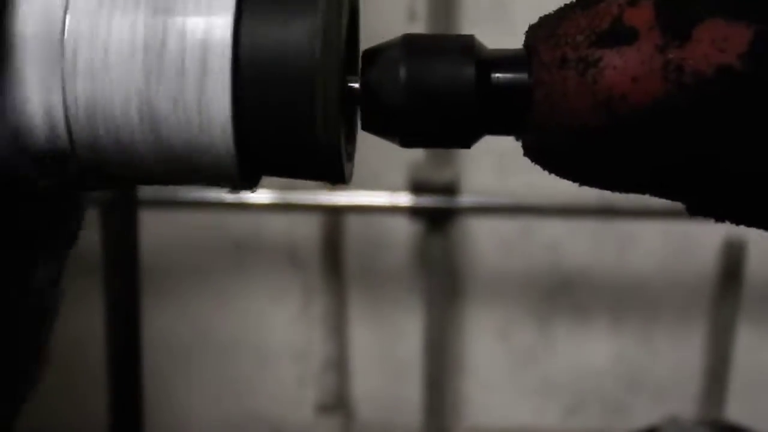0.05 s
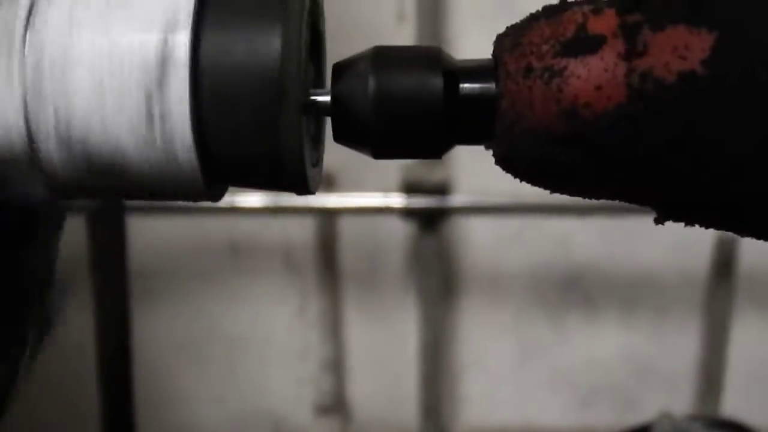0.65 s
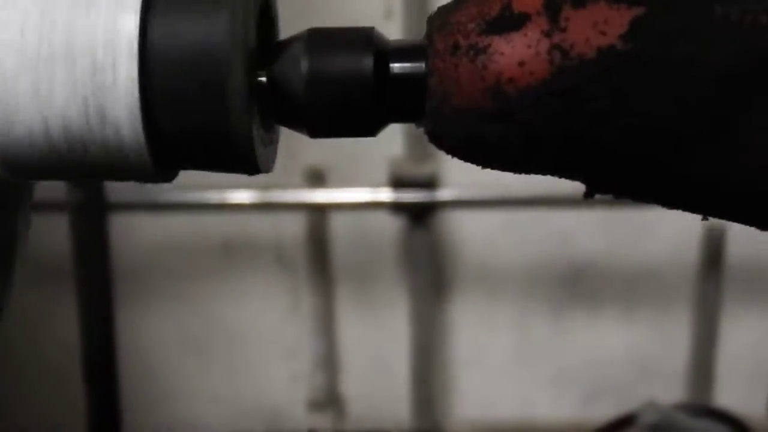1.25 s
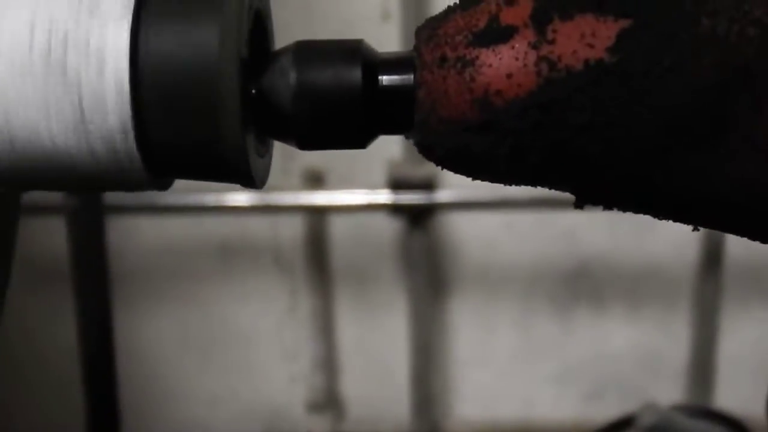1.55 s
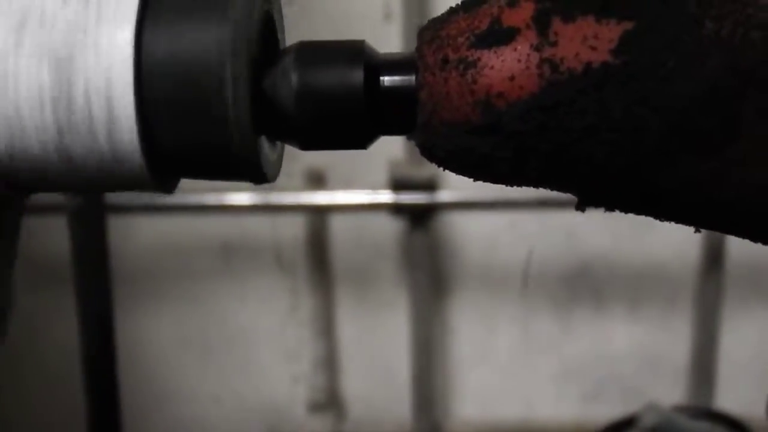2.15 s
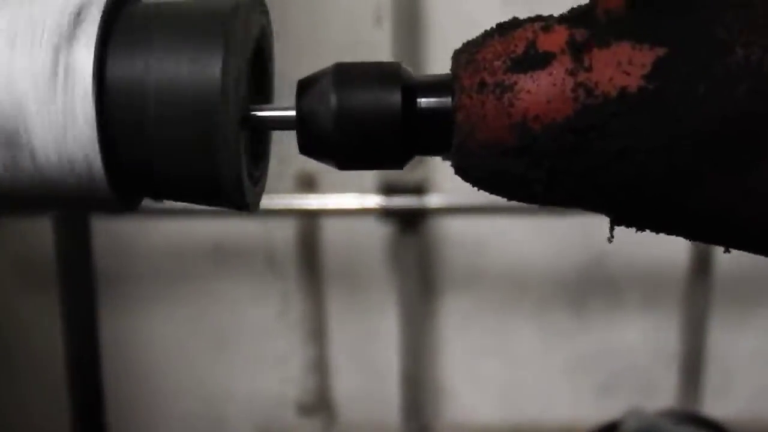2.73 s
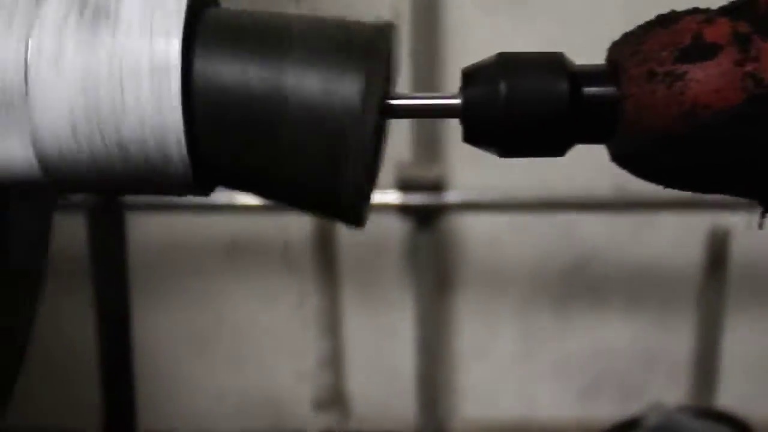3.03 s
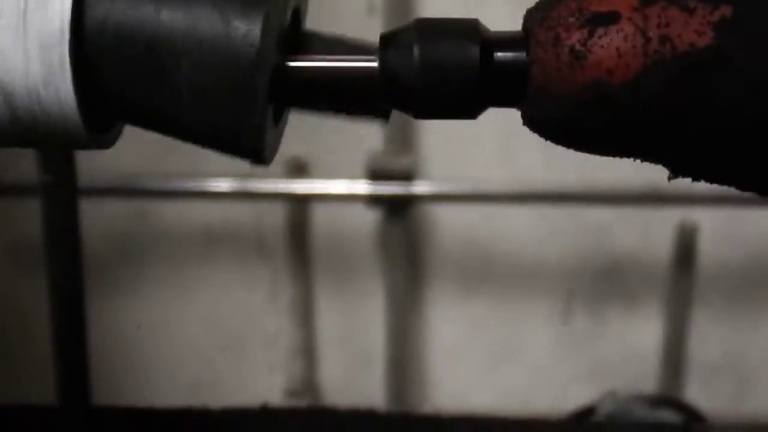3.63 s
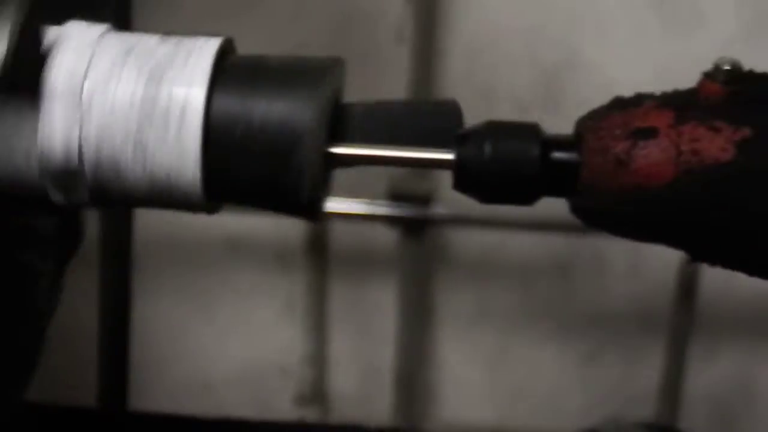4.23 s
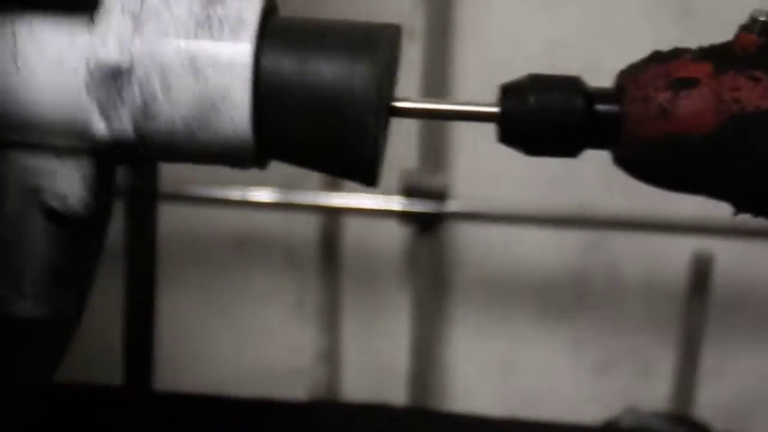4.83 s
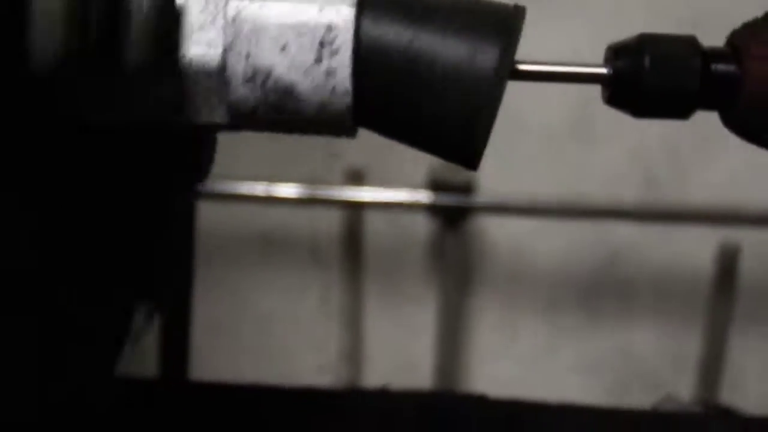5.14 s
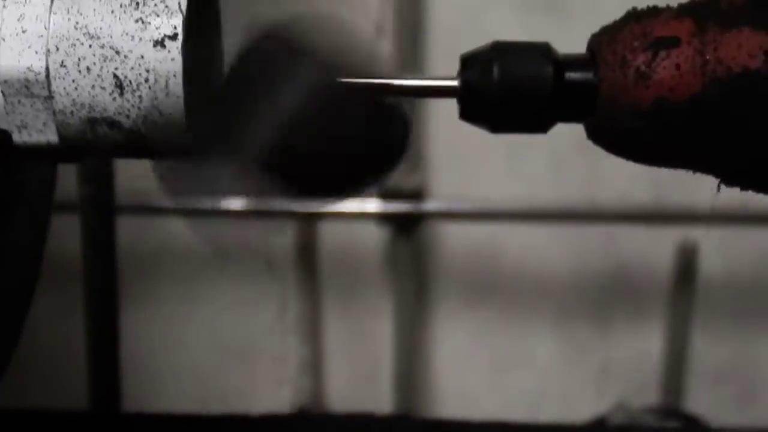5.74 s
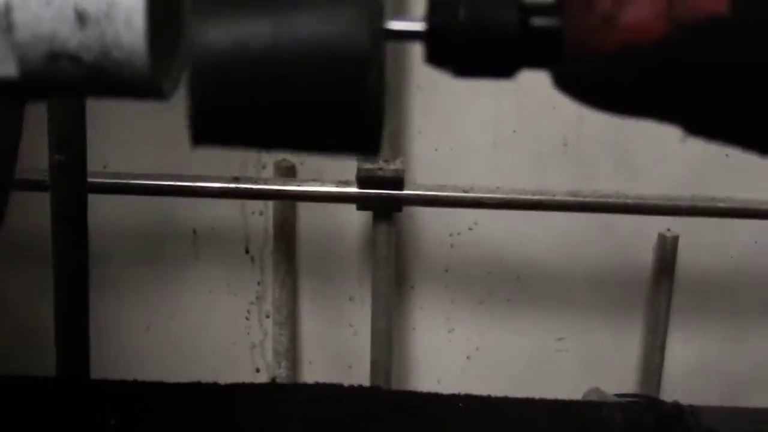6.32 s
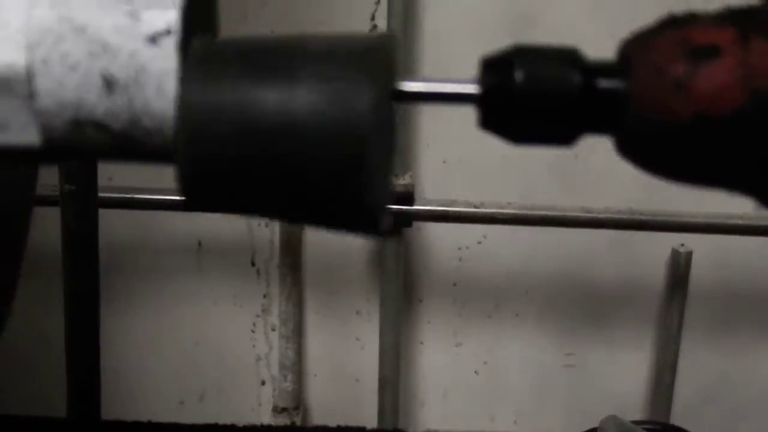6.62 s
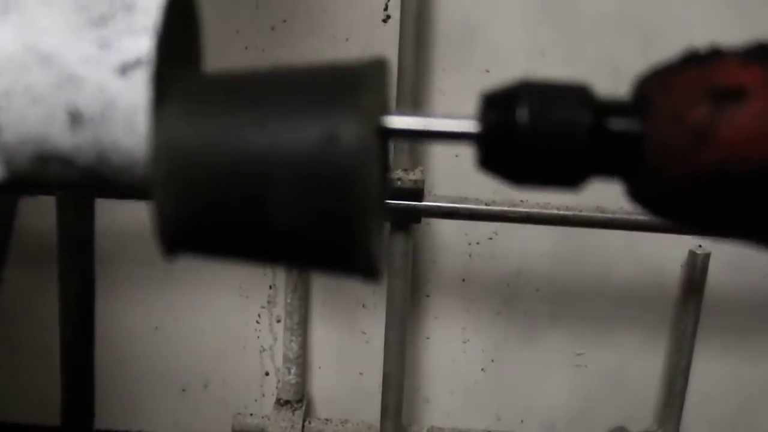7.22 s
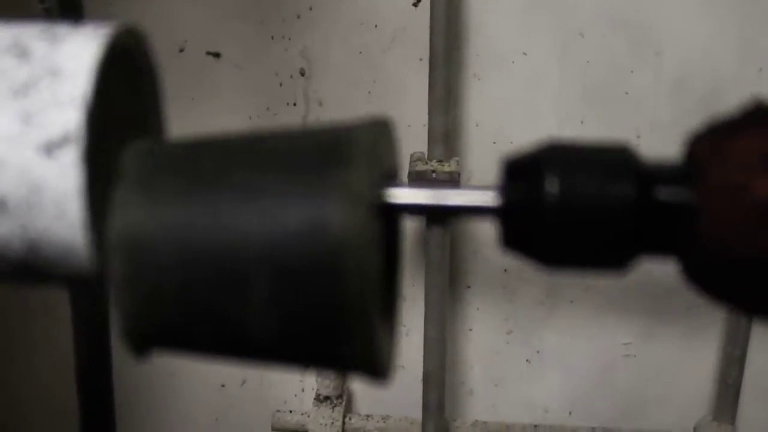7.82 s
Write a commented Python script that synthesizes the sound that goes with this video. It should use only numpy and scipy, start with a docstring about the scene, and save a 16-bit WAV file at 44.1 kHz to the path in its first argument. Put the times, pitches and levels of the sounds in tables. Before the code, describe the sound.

A rotary tool grinds spinning rubber close to the microphone, its high motor whine dipping under load over a rough rasp and many sharp little snaps. A little past halfway the cutting ends and the whine holds steady and clean. Then the power is cut and the pitch falls away in about a second, with dull knocks and light steel pings. Rubber slides faintly twice and knocks once more in the quiet workshop.

```python
"""A die grinder cuts a rubber ring turning twice a second on a lathe in a small workshop. The burr rasps and
snaps on the ring's high spots; the motor sags under the load. At 4.4 s the lathe is switched off, its hum
stops, and the freed grinder whines at full speed over its fan air. At 5.7 s the grinder is switched off and
coasts to rest in a second, brushes chattering, amid knocks and pings of the steel mandrel. Near 7 s the
loose ring slides along the mandrel in two pushes; a last knock follows."""
import sys
import numpy as np
from scipy import signal
from scipy.fft import rfft, irfft, next_fast_len
from scipy.io import wavfile
from scipy.ndimage import uniform_filter1d

SR = 44100
rng = np.random.default_rng(int(sys.argv[2]) if len(sys.argv) > 2 else 0)


def pcm_store(signal):
    """Save signal as 16-bit PCM."""
    levels = np.round(np.clip(np.atleast_2d(signal), -1, 1) * 32767)
    wavfile.write(sys.argv[1], SR, levels.astype(np.int16).T)


N = 351476
T = np.arange(N) / SR

# rotor speed under power: time_s, speed_rps
DRIVEN_SPEED = [(0, 300), (.14, 280), (.3, 271), (.6, 275), (.87, 311), (1.0, 302), (1.2, 291.5),
                (1.45, 294), (1.7, 298), (1.85, 292), (1.99, 290), (2.08, 272), (2.35, 274), (2.43, 291),
                (2.53, 293), (2.67, 309), (2.74, 326), (2.78, 319), (2.84, 331.5), (2.885, 325),
                (2.945, 332.5), (3.04, 328), (3.095, 334), (3.125, 331.5), (3.19, 336.3), (3.24, 334),
                (3.305, 337), (3.39, 333), (3.47, 318), (3.55, 326), (3.62, 329), (3.8, 333.3), (4.32, 333),
                (4.47, 340.6)]
# coast-down, braked by air drag, then dry friction: time_s, speed_rps
COAST_SPEED = [(5.66, 340.6), (5.72, 305.5), (5.8, 265), (5.9, 220.8), (6.0, 183.3), (6.1, 149.1),
               (6.2, 116.6), (6.3, 87.5), (6.4, 60.9), (6.5, 35.7), (6.58, 17), (6.64, 0)]
# rotor and ball-bearing tones: speed_multiple, free_db, rubbing_db, loaded_db
ROTOR_TONES = [(2, -39.5, -43, -46), (2.64, -45, -56, -52), (3, -36, -40.5, -46), (4, -45, -41, -50),
               (5, -38, -36.5, -49), (5.27, -41, -39, -51), (6, -38, -38, -47), (6.355, -35.5, -34.5, -50),
               (7, -32.5, -28, -41.5), (7.65, -44, -43, -52), (8, -39, -40, -64), (9, -39, -42, -53),
               (9.36, -36.5, -46, -44), (10, -38, -37, -60), (10.55, -41, -37, -58), (13, -50, -43, -50),
               (14, -50, -50, -41)]
# overtones of the whine: speed_multiple, free_db, loaded_db
WHINE_OVERTONES = [(23, -71, -59), (24, -54, -53.5), (25, -61.5, -56), (36, -80, -56), (37, -70, -66)]
# resonances that swell the commutator whine: centre_hz, width_hz, gain_db
WHINE_MODES = [(3465, 31, -30), (4192, 283, -20.5)]
# swells and dropouts of the whine: time_s, gain_db
WHINE_LEVEL = [(.75, -3), (.95, -4), (1.28, 3.5), (1.45, 0), (1.7, -2), (2.3, -3), (2.5, 5), (2.64, -18),
               (2.74, -1), (2.79, -6), (2.85, 2), (2.9, -3), (2.96, 3), (3.05, 1), (3.18, 3), (3.32, 1.5),
               (3.39, -1.5), (3.43, -13), (3.51, -14), (3.56, -1), (3.63, -1.5), (3.72, 3.5), (4.15, -1),
               (4.4, 1.5), (4.55, -3), (4.95, 2), (5.16, -1.5), (5.42, 3.5), (5.66, 3)]
# grinder body resonance: centre_hz, width_hz, gain_db
BODY_MODES = [(266.5, 20, 6.5)]
# resonances rung by brush flicks: centre_hz, width_hz, gain_db
BRUSH_MODES = [(1380, 120, -17), (2140, 110, -11), (2400, 120, -2), (2750, 300, -9.5), (3050, 130, -9),
               (3470, 200, -4.5), (3750, 140, -7), (4050, 50, 10.5), (4160, 65, 10.5), (4265, 80, 9),
               (4950, 450, -14)]
# brush holder resonances: centre_hz, width_hz, gain_db
HOLDER_MODES = [(6370, 580, -18), (8500, 740, -21.5), (11300, 1300, -24.5)]
# brush scrape spectrum: freq_hz, gain_db
SCRAPE_SPECTRUM = [(60, -54), (170, -29), (270, -7), (450, -10.5), (600, -2.5), (850, -3), (1400, -1),
                   (1700, -4), (2150, 1), (2250, 3.5), (2370, 7.5), (2700, -12), (3500, 3.5), (4200, 0.5),
                   (4900, -21), (5700, -29.5), (8300, -25.5), (11500, -24), (15000, -57)]
# fan air spectrum: freq_hz, gain_db
AIR_SPECTRUM = [(60, -48), (150, -39), (260, -27.5), (420, -26.5), (600, -12), (1000, -8), (1500, -6),
                (2200, 4), (2750, -0.5), (3300, 1.5), (4200, -1.5), (4900, -15), (5700, -25.5), (8300, -24),
                (11500, -41.5), (15000, -60)]
# housing resonances: centre_hz, width_hz, gain_db
HOUSING_MODES = [(2352, 55, 4), (3400, 910, -28), (4190, 70, 4)]
# how much rubber the burr takes: time_s, level_db
CUT_LEVEL = [(0, -2.5), (.7, 1.5), (1.35, 1.2), (1.6, -3), (2.2, -2), (2.8, 2.5), (3.05, -1), (3.65, 0),
             (3.9, -6), (4.38, -1.5), (4.6, -15)]
# spectrum of tearing rubber: freq_hz, gain_db
RASP_SPECTRUM = [(35, -13), (90, -34), (140, -15), (200, -12), (270, -2), (420, -5.5), (570, 2),
                 (760, -0.5), (1350, 6.5), (1550, -2.5), (1900, -3), (2600, -20), (3500, 5.5), (4300, -6),
                 (5500, -22), (10000, -28), (15000, -40.5)]
# cutter resonances: centre_hz, width_hz, gain_db
CUTTER_MODES = [(573.6, 27, -1.5), (960, 200, -7), (1694, 68, -3), (2035, 19, 2.5), (2110, 60, -4),
                (2705, 20, -11), (3550, 190, 2.5), (4125, 130, 0.5)]
# catches on high spots, many a lathe turn apart: start_s, pitch_hz, snap_db, thud_db, edge_db, length_s
CATCHES = [(0.087, 1830, -17.5, -48, -38, 0.0063), (0.137, 2010, -19.5, -38, -25.5, 0.01),
           (0.217, 1890, -14, -31, -14.5, 0.01), (0.234, 1910, -19, -25.5, -19, 0.009),
           (0.247, 2020, -30.5, -25.0, -16.5, 0.0059), (0.298, 1790, -10.5, -19.5, -20, 0.011),
           (0.392, 1880, -25, -29, -21, 0.004), (0.508, 1860, -16.5, -23, -14, 0.014),
           (0.577, 1990, -33, -19.5, -29, 0.0078), (0.64, 1940, -14.5, -24, -34, 0.015),
           (0.65, 2020, -20.0, -21, -27, 0.012), (0.717, 1950, -17.5, -36.0, -23, 0.009),
           (0.752, 1990, -17, -22, -22, 0.007), (0.8, 1760, -13.5, -18.5, -24.5, 0.0086),
           (0.893, 1960, -18.0, -30, -16.5, 0.0054), (0.971, 1990, -20, -23.5, -23, 0.0072),
           (1.008, 1960, -15, -20.5, -20.0, 0.0092), (1.098, 1740, -13, -19, -28, 0.0072),
           (1.141, 1880, -16, -29, -29, 0.0029), (1.185, 1980, -25, -26, -31, 0.007),
           (1.295, 1770, -19.5, -17.5, -26, 0.0091), (1.388, 1810, -16, -23, -18, 0.0095),
           (1.508, 1800, -15.0, -22, -13, 0.005), (1.598, 1740, -17.5, -25, -26, 0.0092),
           (1.641, 1930, -18.5, -31, -16, 0.0093), (1.722, 1920, -14.0, -24.5, -26, 0.006),
           (1.806, 1780, -13.5, -23.5, -30, 0.0029), (1.977, 1960, -30.0, -33, -20.5, 0.0064),
           (2.01, 1800, -12.0, -38.0, -13.0, 0.0085), (2.143, 1820, -23.5, -27.5, -20, 0.0046),
           (2.24, 2030, -23.5, -35, -16.5, 0.008), (2.26, 1900, -17, -23.0, -17, 0.011),
           (2.305, 1790, -12.0, -24.0, -23.0, 0.005), (2.351, 1790, -29.5, -20.5, -28.0, 0.0054),
           (2.393, 1880, -10.5, -20.5, -15, 0.006), (2.413, 1940, -29, -23.5, -29, 0.0051),
           (2.488, 2000, -16.5, -30, -14.5, 0.015), (2.509, 1870, -10.5, -29, -28, 0.011),
           (2.645, 1970, -20, -34, -25, 0.0033), (2.803, 1910, -10.5, -26, -13, 0.013),
           (2.901, 2180, -25.5, -27, -20, 0.0053), (3.014, 1760, -13, -20, -13.5, 0.012),
           (3.232, 1860, -24.5, -21, -13.5, 0.0057), (3.307, 1800, -12.5, -31, -20, 0.0083),
           (3.519, 1860, -12.0, -19.0, -19.0, 0.0039), (3.709, 2010, -24, -25, -27, 0.0037),
           (3.775, 2120, -30.5, -23.0, -18, 0.011), (3.805, 1820, -15, -36, -21.5, 0.006),
           (4.015, 1780, -14, -20, -18, 0.0082), (4.102, 2010, -15.5, -25, -17, 0.015),
           (4.149, 1870, -16.5, -24.5, -21, 0.0077), (4.315, 1790, -13.5, -17.5, -26.5, 0.007),
           (4.369, 1770, -13, -31, -18, 0.0087), (4.38, 2070, -25, -30, -18, 0.007),
           (4.469, 2180, -18.5, -43.5, -33, 0.0054), (4.526, 2060, -17, -23.5, -19, 0.013),
           (4.56, 2210, -15.5, -23.5, -28.5, 0.01)]
# knocks of the loose ring and the tool, relative levels: start_s, knock_db, bass_db
KNOCKS = [(5.119, -19, -68), (5.708, -12, -62), (5.738, -19, -48), (5.754, -10, -51), (5.772, -14, -58),
          (5.842, -17, -54), (6.138, -23, -62), (6.807, -25.5, -70), (7.526, -34, -68), (7.632, -11.5, -51)]
# knock spectrum: freq_hz, gain_db
KNOCK_SPECTRUM = [(60, -61), (250, -7), (700, -2), (1600, 3.5), (2600, 3.5), (3900, 1), (5200, -43),
                  (7000, -40), (14000, -62)]
# pushes of the ring along the mandrel: centre_s, half_width_s, level_db
PUSHES = [(6.878, 0.064, -42.5), (7.074, 0.097, -42)]
# spectrum of sliding rubber: freq_hz, gain_db
SLIDE_SPECTRUM = [(70, -53), (400, -14), (1400, 1.5), (2200, 1), (2600, -4), (3500, 3.5), (4200, 1),
                  (5500, -21), (9000, -26), (14000, -40)]
# steel mandrel pings: start_s, pitch_hz, level_db, t60_s
MANDREL_PINGS = [(3.406, 5400, -13, 0.0059), (5.119, 2046, -5, 0.077), (5.119, 3100, -9, 0.044),
                 (5.754, 3930, -8, 0.023), (6.139, 2520, -15, 0.034), (6.697, 2550, -34, 0.059)]
# lathe drive tones: pitch_hz, level_db
LATHE_TONES = [(389.8, -48.5), (581, -52), (1162, -47.5)]
# workshop background spectrum: freq_hz, gain_db
SHOP_SPECTRUM = [(50, -42), (100, -24), (155, -4.5), (190, -11.5), (290, 4), (520, 0.5), (1000, -2.5),
                 (1800, -3), (2700, -6), (3800, -1.5), (5500, -24), (9000, -29.5), (15000, -32)]
# microphone port level, left over right: freq_hz, gain_db
PORT_BALANCE = [(60, -0.038), (89, 0.0), (130, 0.0), (190, 0.0), (290, 0.0), (430, 0.0), (630, 0.0),
                (930, -0.49), (1380, -0.39), (2050, -0.88), (3030, 1), (4480, -1.9)]
# microphone port phase, left minus right: freq_hz, phase_rad
PORT_PHASE = [(0, 0), (500, -.07), (1000, -.09), (2070, .2), (3000, -.12), (3700, -.2), (4050, -.52),
              (5000, -.5), (9000, -.55), (13000, -2)]

LATHE_TURN_S, LATHE_OFF_S, GRINDER_OFF_S = .5015, 4.39, 5.66
FREE_RPS, FULL_LOAD_SAG_RPS = 340.6, 36
COMMUTATOR_BARS = 12


def rotor_speed(load, catch_sag_rps=6):
    """Speed in rps: shaken by load, braked by each catch, coasting once the power is off."""
    start_s, _, snap_db, *_ = np.transpose(CATCHES)
    braking = uniform_filter1d(bursts(start_s, snap_db, hold_s=.02, fall_s=.035), size=SR // 30)
    jitter = (.0004 + .0016 * load) * drift(11)
    driven = curve(DRIVEN_SPEED) * (1 + jitter) - catch_sag_rps * np.minimum(2 * load, 1) ** 2 * braking
    return np.where(T < GRINDER_OFF_S, driven, curve(COAST_SPEED))


def motor_tones(speed_rps, turns, load, critical_rps=291.5, critical_width_rps=5, critical_db=9):
    """Rotor, bearing and commutator tones: clean when free, rough under load."""
    def tone(multiple, jitter_rad, waver_db=2.0):
        phase = 2 * np.pi * (multiple * turns + rng.random()) + jitter_rad * drift(32)
        return np.sqrt(2) * np.sin(phase) * from_db((waver_db + 1.5 * load) * drift(8))

    rotor = sum(from_db(np.interp(load, [0, .24, 1], levels_db)) * tone(multiple, .12 + .4 * load)
                for multiple, *levels_db in ROTOR_TONES)
    shaft_resonance = from_db(critical_db * load / (1 + ((speed_rps - critical_rps) / critical_width_rps) ** 2))
    rotor *= shaft_resonance * np.where(T < GRINDER_OFF_S, 1, (speed_rps / FREE_RPS) ** 6)
    overtones = 0
    for multiple, free_db, loaded_db in WHINE_OVERTONES:
        partial = from_db(free_db + (loaded_db - free_db) * load) * tone(multiple, .47 + .2 * load)
        waver = from_db(3.5 * drift(2.9) * np.sqrt(load + .092))
        radiation = 1 / (1 + (multiple * speed_rps / 11500) ** 16)
        overtones += partial * waver * radiation
    overtones *= switch_off(GRINDER_OFF_S, release_s=.065)
    imbalance = from_db(-51 + 1.35 * load) * np.minimum(speed_rps / BODY_MODES[0][0], 1) ** 4
    boom = resonate(imbalance * tone(.98, .11), BODY_MODES)
    whine = whine_gain(COMMUTATOR_BARS * speed_rps) * tone(COMMUTATOR_BARS, .14 + .09 * load, waver_db=1.05)
    return rotor + overtones + whine + boom


def whine_gain(pitch_hz, floor_db=-35.5):
    """The commutator whine swells near resonances and dies with the power."""
    peaks = sum(from_db(gain_db) ** 2 / (1 + ((pitch_hz - centre_hz) / width_hz) ** 2) ** 2
                for centre_hz, width_hz, gain_db in WHINE_MODES)
    gain = np.sqrt(from_db(floor_db) ** 2 + peaks)
    return gain * from_db(curve(WHINE_LEVEL)) * switch_off(GRINDER_OFF_S, release_s=.049)


def cut_depth(load, runout_db=.7, runout_peak_s=.34, fade_s=.24):
    """Cut gain: follows the hand, swells once a turn as the ring is out of round, then fades."""
    fade = switch_off(CUT_LEVEL[-1][0], fade_s)
    runout = np.cos(2 * np.pi * (T - runout_peak_s) / LATHE_TURN_S)
    return fade * from_db(curve(CUT_LEVEL) + runout_db * load * runout)


def burr_rasp(turns, cut, rasp_db=-26.5, ring_db=-25):
    """The burr tears rubber crumbs, hardest once a rotor turn; the cutter rings."""
    tearing = grains(6000, 2.85) * (1 + .5 * np.sin(2 * np.pi * turns)) * from_db(3.3 * drift(48))
    rasp = unit_rms(colour(tearing, RASP_SPECTRUM))
    ring = sum(resonate(grains(5000, 3), [mode]) * from_db(3 * drift(9)) for mode in CUTTER_MODES)
    return cut * (from_db(rasp_db) * rasp + from_db(ring_db) * unit_rms(band(ring, 400, 3540)))


def burr_catches(trim_db=-1.87, band_ratio=1.19):
    """Each catch: a pitched snap, a slower thud of the ring, a bright edge."""
    out = np.zeros(N + SR)
    for start_s, pitch_hz, snap_db, thud_db, edge_db, length_s in CATCHES:
        snap = from_db(snap_db) * rubber_slips(pitch_hz / band_ratio, pitch_hz * band_ratio, length_s)
        thud = from_db(thud_db) * rubber_slips(468, 718, 1.6 * length_s)
        edge = from_db(edge_db) * rubber_slips(2700, 4040, length_s)
        start = round(start_s * SR)
        out[start:start + len(snap)] += snap + thud + edge
    return from_db(trim_db) * lowpass(out[:N], 4600, order=6)


def rubber_slips(low_hz, high_hz, length_s, slips_per_s=4000):
    """One firm slip and a dying run of small ones, band-limited by the soft rubber."""
    age_s = np.arange(SR // 8) / SR
    run = rng.standard_normal(len(age_s)) * (rng.random(len(age_s)) < slips_per_s / SR)
    run[SR // 800] = 3  # the firm slip
    envelope = np.minimum(age_s / .0012, 1) / (1 + (age_s / length_s) ** 2)
    slips = band(run * envelope, low_hz, high_hz)
    return slips / np.sqrt(np.sum(slips ** 2) / (SR / 100))  # energy of 10 ms at unit power


def fan_and_scrape(speed_rps, load, cut, air_db=-23, housing_db=-39.5, scrape_db=-31):
    """Fan air and housing ring grow with speed and cut; brush scrape outlasts them. Load adds flutter."""
    air = from_db(air_db) * unit_rms(colour(grains(15000, 3.2), AIR_SPECTRUM))
    housing = from_db(housing_db) * unit_rms(band(resonate(rng.standard_normal(N), HOUSING_MODES), 1200, 3000))
    scrape = from_db(scrape_db) * unit_rms(colour(grains(9000, 1.95), SCRAPE_SPECTRUM))
    flutter = from_db((.7 + .9 * load) * drift(22))
    blowing = (speed_rps / FREE_RPS) ** 1.56 * (1 + .25 * cut)
    scraping = np.minimum(speed_rps / 110, 1) ** 2.1
    return (blowing * (air + housing) + scraping * scrape) * flutter


def brush_chatter(speed_rps, turns, gain_db=-29, flick_s=2.5e-5, fade_below_rps=70):
    """Each commutator bar flicks the brushes with its own strength; heard once the power is off."""
    bars, bar_hz = COMMUTATOR_BARS * turns, COMMUTATOR_BARS * speed_rps + 1
    offset_s = (bars % 1 - .5 + .017 * drift(150)) / bar_hz
    wear = from_db(2 * rng.standard_normal(COMMUTATOR_BARS))[bars.astype(int) % COMMUTATOR_BARS]
    strength = wear / wear.mean() * from_db(2.2 * drift(400)) * (speed_rps > 1)
    flicks = np.exp(-(offset_s / flick_s) ** 2) * strength * 18000 / np.maximum(bar_hz, 300)
    ring = resonate(flicks * (1 + .2 * rng.standard_normal(N)), BRUSH_MODES)
    holder = resonate(flicks * (1 + .35 * rng.standard_normal(N)), HOLDER_MODES)
    sizzle = band(holder, 6200, 12500) * (speed_rps / 155) ** .85  # slower flicks are duller
    onset = 1 - switch_off(GRINDER_OFF_S, release_s=.15)
    fade = np.minimum(speed_rps / fade_below_rps, 1) ** 1.1
    return from_db(gain_db) * onset * fade * (lowpass(ring, 4300, order=4) + lowpass(sizzle, 12500, order=8))


def knocks():
    """Ring and tool knock dully: a clack, a short tail, a little bass."""
    start_s, knock_db, bass_db = np.transpose(KNOCKS)
    rattle, boom = rng.standard_normal((2, N))
    clack = bursts(start_s, knock_db - 17, hold_s=.0085, fall_s=.0033)
    tail = bursts(start_s, knock_db - 22, hold_s=.004, fall_s=.039)
    thump = bursts(start_s, bass_db - .5, hold_s=.014, fall_s=.1)
    hits = colour((clack + tail) * rattle, KNOCK_SPECTRUM) / np.std(colour(rattle, KNOCK_SPECTRUM))
    bass = band(thump * boom, 115, 330) / np.std(band(boom, 150, 450))
    return hits + bass


def mandrel_pings():
    """Each touch rings one damped note in the steel."""
    out = np.zeros(N)
    for start_s, pitch_hz, level_db, t60_s in MANDREL_PINGS:
        age_s = np.clip(T - start_s, 0, 1)
        note = from_db(level_db - 60 * age_s / t60_s) * np.sin(2 * np.pi * pitch_hz * age_s)
        out += band(note, pitch_hz / 1.24, pitch_hz * 1.016)
    return out


def ring_slide():
    """Rubber rubs along the mandrel, one swell a push."""
    envelope = sum(from_db(level_db) * np.exp(-((T - centre_s) / half_width_s) ** 2)
                   for centre_s, half_width_s, level_db in PUSHES)
    return envelope * unit_rms(colour(grains(12000, 2), SLIDE_SPECTRUM))


def lathe_hum(load, hum_hz=120, idle_db=-51, load_rise_db=2):
    """Mains hum, stronger under load, and wavering drive tones."""
    mains = from_db(idle_db + load_rise_db * load) * np.sin(2 * np.pi * hum_hz * T)
    drive = sum(np.sin(2 * np.pi * pitch_hz * T + .5 * drift(9.2)) * from_db(level_db + 2 * drift(2.8))
                for pitch_hz, level_db in LATHE_TONES)
    return np.sqrt(2) * (mains + drive) * switch_off(LATHE_OFF_S, release_s=.022)


def shop_noise(level_db=-47):
    """Steady workshop background."""
    return from_db(level_db) * unit_rms(colour(rng.standard_normal(N), SHOP_SPECTRUM))


def shop_reflections(direct, t60_s=.94):
    """Diffuse reflections, mostly treble, different on each side."""
    send = (from_db(-41) * band(direct, 150, 960) + from_db(-28) * band(direct, 1200, 14000)
            + from_db(-5.5) * band(direct, 5340, 16000))
    age_s = np.arange(SR // 3) / SR
    tails = rng.standard_normal((2, len(age_s))) * from_db(-60 * age_s / t60_s) * (age_s > .004)
    return np.array([signal.oaconvolve(send, tail / np.linalg.norm(tail))[:N] for tail in tails])


def from_db(db):
    """Decibels to gain."""
    return 10 ** (np.asarray(db) / 20)


def unit_rms(x):
    """Scale to unit power."""
    return x / np.sqrt(np.mean(x ** 2) + 1e-20)


def curve(rows):
    """Interpolate (time_s, value) rows at every sample."""
    return np.interp(T, *np.transpose(rows))


def switch_off(off_s, release_s):
    """Gain 1 until off_s, then exponential decay."""
    return np.exp(-np.maximum(T - off_s, 0) / release_s)


def drift(rate_hz, hop=20, warmup=2000):
    """Smooth random wander of unit RMS."""
    pole = np.exp(-2 * np.pi * hop * rate_hz / SR)
    noise = rng.standard_normal(N // hop + warmup + 2)
    slow = signal.lfilter([1], [1, -2 * pole, pole * pole], noise)[warmup:]
    return np.interp(np.arange(N) / hop, np.arange(len(slow)), unit_rms(slow))


def grains(per_s, spread_db):
    """Random clicks of uneven size, unit RMS."""
    sizes = from_db(spread_db * np.minimum(rng.exponential(1, N), 4)) * rng.choice([-1, 1], N)
    return unit_rms(sizes * (rng.random(N) < per_s / SR))


def bursts(starts_s, levels_db, hold_s, fall_s, attack_s=.00168):
    """Envelope of short bursts: attack, hold, decay."""
    out, age_s = np.zeros(N + SR), np.arange(SR // 4) / SR
    shape = np.minimum(age_s / attack_s, 1) * np.exp(-np.maximum(age_s - hold_s, 0) / fall_s)
    for start_s, level_db in zip(starts_s, levels_db):
        start = round(start_s * SR)
        out[start:start + len(shape)] += from_db(level_db) * shape
    return out[:N]


def colour(x, spectrum):
    """Minimum-phase filter from (freq_hz, gain_db) rows."""
    size = next_fast_len(N + SR // 4)
    freq_hz, gain_db = np.transpose(spectrum)
    bins_hz = np.arange(size + 1) * SR / (2 * size)
    log_gain = np.log(from_db(np.interp(np.log(bins_hz + 1), np.log(freq_hz), gain_db)))
    causal_cepstrum = 2 * irfft(log_gain)[:size]
    response = np.exp(rfft(causal_cepstrum, 2 * size) - log_gain.mean())
    return signal.oaconvolve(x, irfft(response)[:SR // 16])[:N]


def band(x, low_hz, high_hz):
    """Band-pass."""
    return signal.sosfilt(signal.butter(2, [low_hz, high_hz], "band", fs=SR, output="sos"), x + 1e-18)


def lowpass(x, cutoff_hz, order):
    """Low-pass."""
    return signal.sosfilt(signal.butter(order, cutoff_hz, fs=SR, output="sos"), x)


def resonate(x, modes):
    """Parallel resonators of alternating sign."""
    out = 0
    for k, (centre_hz, width_hz, gain_db) in enumerate(modes):
        radius = np.exp(-np.pi * width_hz / SR)
        feedforward = np.array([1, 0, -1]) * (1 - radius ** 2) / 2
        feedback = [1, -2 * radius * np.cos(2 * np.pi * centre_hz / SR), radius ** 2]
        out += (-1) ** k * from_db(gain_db) * signal.lfilter(feedforward, feedback, x + 1e-18)
    return out


def scene():
    """Grinder, handling, lathe and room; load (0 to 1) follows the motor's sag."""
    load = np.clip((FREE_RPS - curve(DRIVEN_SPEED)) / FULL_LOAD_SAG_RPS, 0, 1)
    speed_rps, cut = rotor_speed(load), cut_depth(load)
    turns = np.cumsum(speed_rps) / SR
    direct = motor_tones(speed_rps, turns, load) + brush_chatter(speed_rps, turns)
    direct += fan_and_scrape(speed_rps, load, cut) + burr_rasp(turns, cut) + burr_catches()
    direct += mandrel_pings() + knocks() + ring_slide()
    return direct + shop_noise() + lathe_hum(load) + shop_reflections(direct)


def record(dry, low_cut_hz=88, high_cut_hz=15000, ceiling=.92):
    """Two-port microphone: low cut, two notches, port level and phase offsets, soft clip, high cut."""
    dry = signal.sosfilt(signal.butter(4, low_cut_hz, "high", fs=SR, output="sos"), dry)
    for notch_hz, q in [(218, 10.7), (1100, 5.66)]:
        dry = signal.lfilter(*signal.iirnotch(notch_hz, q, fs=SR), dry)
    size = next_fast_len(N + 2000)
    bins_hz = np.arange(size // 2 + 1) * SR / size
    balance_db = np.interp(bins_hz, *np.transpose(PORT_BALANCE))
    phase_rad = np.interp(bins_hz, *np.transpose(PORT_PHASE))
    left = from_db(balance_db / 2) * np.exp(.5j * phase_rad)
    ports = irfft(rfft(dry, size) * [left, 1 / left], size)[:, :N]
    rounded = ports / (1 + (ports / ceiling) ** 8) ** (1 / 8)
    return lowpass(rounded, high_cut_hz, order=12)


dry = scene()
out = record(dry)
pcm_store(out)
```